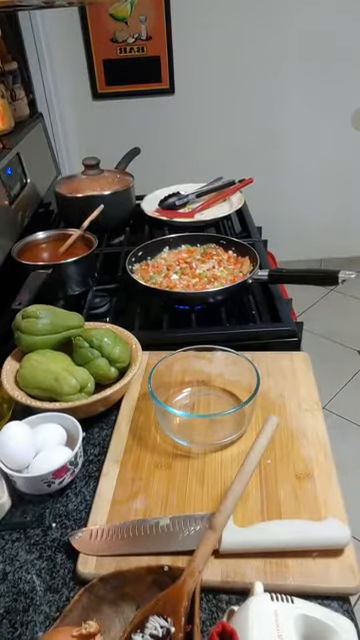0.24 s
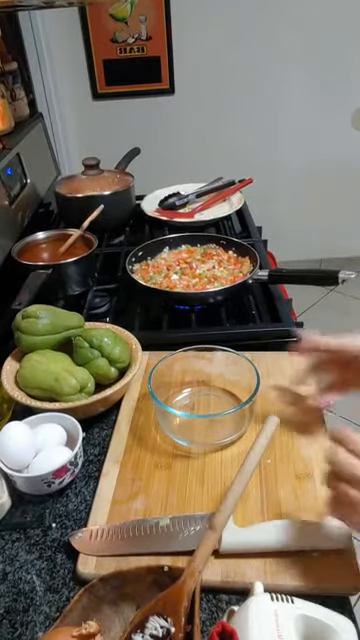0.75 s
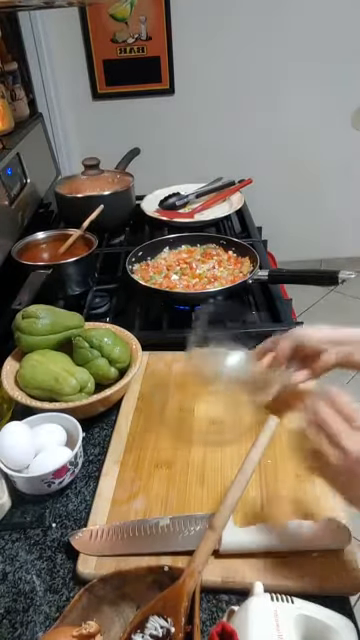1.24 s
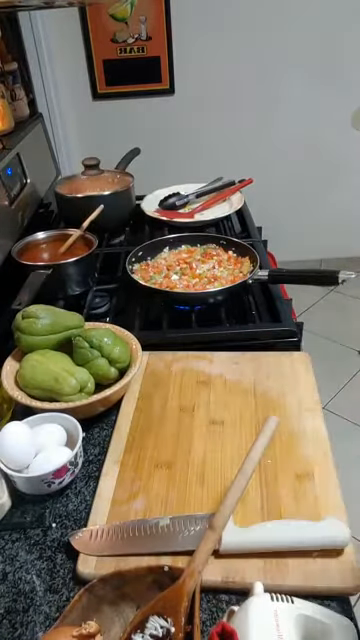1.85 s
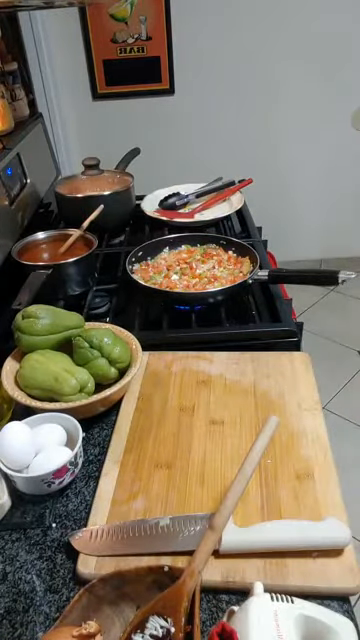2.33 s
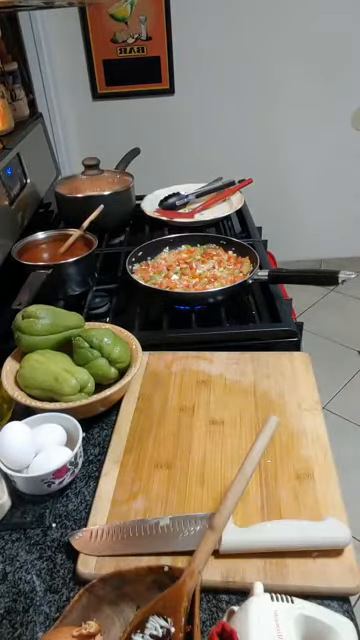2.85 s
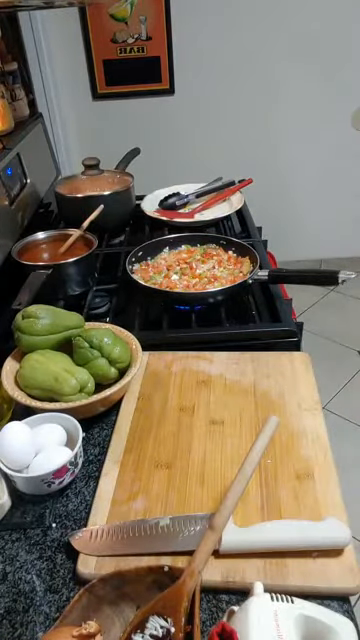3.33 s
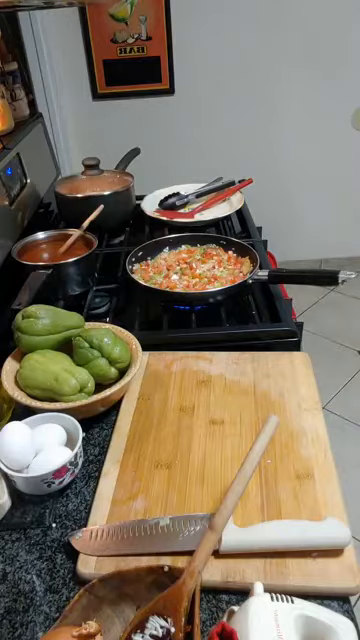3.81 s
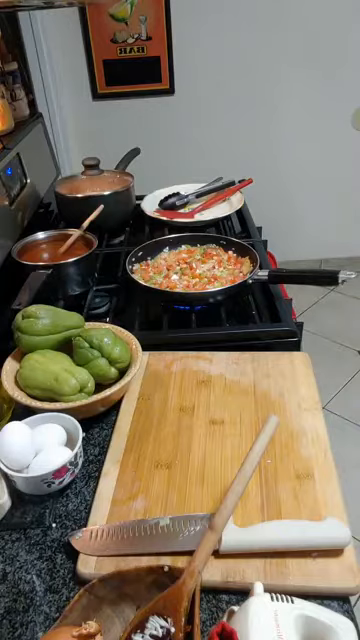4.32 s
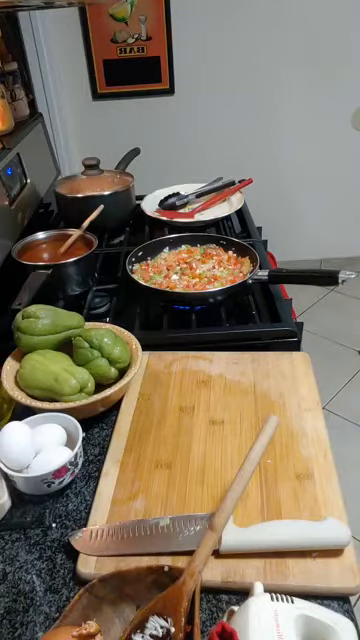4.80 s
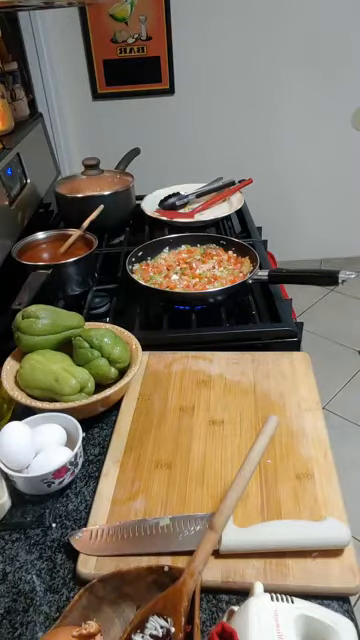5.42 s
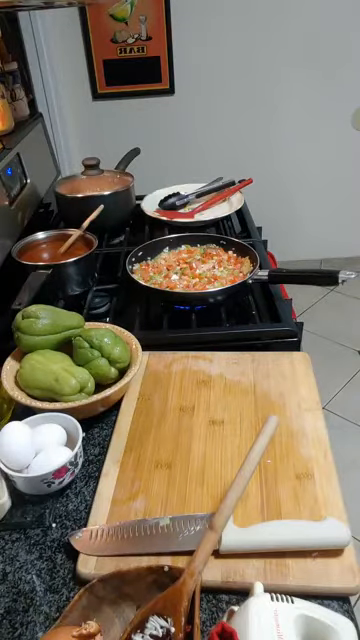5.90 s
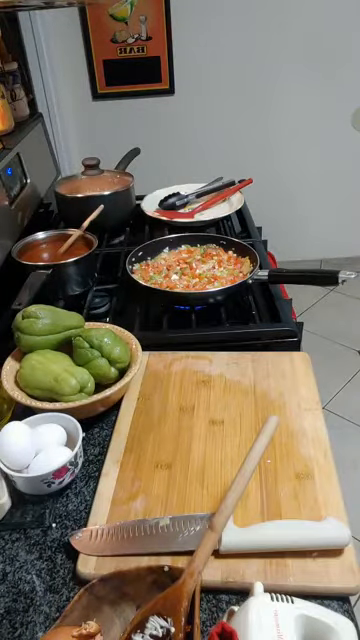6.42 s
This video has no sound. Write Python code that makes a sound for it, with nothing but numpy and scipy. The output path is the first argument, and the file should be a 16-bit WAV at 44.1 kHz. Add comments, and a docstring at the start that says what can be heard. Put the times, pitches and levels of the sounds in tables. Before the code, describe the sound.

In a small kitchen with low hum and soft frying, a glass bowl slides, thuds, clatters thrice at a sink; bright tap water runs, then stops.

```python
"""Kitchen: glass bowl and running tap

In a small hard-walled kitchen a pan sizzles over a gas flame and a refrigerator hums: coloured noise and sines.
A glass bowl is slid off a wooden board (grainy noise), something thumps (noise and a low sine), and the bowl
is rapped three times at the sink (noise cracks, decaying modes). The tap spurts, then hisses for a few seconds
(random bursts, noise through spout resonances, fizzing bubbles, gurgling noise bands), is shut, and drips
(noise ticks) among faint clinks."""
import sys
import numpy as np
from scipy import signal
from scipy.fft import rfft, irfft, next_fast_len
from scipy.io import wavfile
from scipy.ndimage import map_coordinates

SR = 44100
rng = np.random.default_rng(int(sys.argv[2]) if len(sys.argv) > 2 else 0)


def master_out(mix):
    """Clip the mix to full scale and print it as 16-bit PCM to the path in sys.argv[1]."""
    frames = np.transpose(np.atleast_2d(mix))
    ceiling = np.clip(frames, -1, 1)
    pcm = np.round(ceiling * 32767).astype(np.int16)
    wavfile.write(sys.argv[1], SR, pcm)


N = 293397
TIME = np.arange(N) / SR


def amp(db):
    """Decibels to gain."""
    return 10 ** (np.asarray(db) / 20)


def unit(x):
    """x scaled to rms 1."""
    return x / np.sqrt(np.mean(x ** 2) + 1e-20)


def wobble(rate_hz):
    """Smooth random curve through rate_hz normal-distributed knots a second."""
    knots = rng.standard_normal(int(N * rate_hz / SR) + 4)
    return map_coordinates(knots, [TIME * rate_hz])


def ramp(start_s, length_s):
    """0 until start_s, then rising evenly to 1 over length_s."""
    return np.clip((TIME - start_s) / length_s, 0, 1)


def since(start_s):
    """Seconds gone by since start_s, 0 before it."""
    return np.maximum(TIME - start_s, 0)


def decay(age_s, t60_s):
    """Exponential decay by 60 dB in t60_s."""
    return np.exp(-np.log(1000) * age_s / t60_s)


def fade(start_s, attack_s, t60_s):
    """Envelope of a blow: exponential attack with time constant attack_s, then decay."""
    age_s = TIME[:int(2 * t60_s * SR)]
    shape = (1 - np.exp(-age_s / attack_s)) * decay(age_s, t60_s)
    return np.pad(shape, (round(start_s * SR), N))[:N]


def filtered(x, response):
    """x times a response of frequency, zero-padded against wrap-around."""
    size = next_fast_len(N + SR // 2)
    hz = np.fft.rfftfreq(size, 1 / SR)
    return irfft(rfft(x, size) * response(hz), size)[:N]


def coloured(x, spectrum):
    """x filtered by a (Hz, dB) curve, interpolated over log frequency, at rms 1."""
    f, db = np.transpose(spectrum)
    return unit(filtered(x, lambda hz: amp(np.interp(np.log(hz + 1), np.log(f), db))))


def roomy(x, wet_db=0, t60_s=0.34):
    """Direct sound plus a dense tail from the walls, which ripples a steady spectrum."""
    age_s = TIME[:SR // 2]
    tail = rng.standard_normal(len(age_s)) * decay(age_s, t60_s)
    tail /= np.linalg.norm(tail)
    return x + amp(wet_db) * signal.fftconvolve(x, tail)[:N]


def noise(spectrum):
    """Smooth noise with a (Hz, dB) spectrum, heard in the room, rms 1."""
    return coloured(roomy(rng.standard_normal(N), wet_db=-1.0, t60_s=0.4), spectrum)


def patter(rate_hz, spread_db, life_s):
    """Noise bursts at random moments and of random sizes, amplitude falling by e in life_s; rms 1."""
    hits = rng.random(N) < rate_hz / SR
    sizes = amp(spread_db * np.clip(rng.standard_normal(N), -2, 2))
    cloud = signal.lfilter([1], [1, -np.exp(-2 / (life_s * SR))], hits * sizes ** 2)  # energy
    return unit(np.sqrt(cloud) * rng.standard_normal(N))


def tone(hz):
    """Sine of rms 1 and random phase."""
    return np.sqrt(2) * np.sin(2 * np.pi * (hz * TIME + rng.random()))


def resonance(hz, centre_hz, width_hz):
    """Complex response of one resonance, peak gain 1."""
    return 1j * hz * width_hz / (centre_hz ** 2 - hz ** 2 + 1j * hz * width_hz)


def resonant(centre_hz, width_hz):
    """White noise through one resonance."""
    return filtered(rng.standard_normal(N), lambda hz: resonance(hz, centre_hz, width_hz))


def murmur(centre_hz, width_hz):
    """Band of noise, 6 dB down at the edges of width_hz, rms 1."""
    return unit(filtered(rng.standard_normal(N), lambda hz: 1 / (1 + (2 * (hz - centre_hz) / width_hz) ** 2)))


def ringing(hz, envelope):
    """One mode whose reflections interfere with it, so that level and phase waver."""
    interference = amp(2 * wobble(110))
    phase_rad = 0.76 * wobble(80)
    return envelope * interference * np.sqrt(2) * np.sin(2 * np.pi * hz * TIME + phase_rad)


# fat in the pan: (frequency [Hz], density [dB per Hz])
SIZZLE_SPECTRUM = [(300, -7.5), (710, -9.5), (1200, -23.5), (1760, -18), (2000, -16.5), (2170, -15.5),
                   (3540, -12), (5040, -12), (6880, 0.5), (7560, 3.5), (8470, -7), (9210, -14),
                   (10500, -17), (13500, -18.5), (14400, -25)]
PAN_DB, PAN_WANDER_DB = -54, 0.1
# fat spitting: (time [s], level [dB])
SPITS = [(.23, -61), (.43, -56), (0.66, -51), (2.325, -58), (2.437, -50)]


def pan():
    """Countless tiny bursts of frying fat, swelling at each spit."""
    frying = amp(PAN_DB + PAN_WANDER_DB * wobble(4.5))
    spits = sum(amp(db) * fade(s, 0.001, 0.36) for s, db in SPITS)
    bursts = patter(rate_hz=2500, spread_db=-0.5, life_s=0.0034)
    return (frying + spits) * coloured(roomy(bursts, wet_db=-9.5), SIZZLE_SPECTRUM)


# flame roar and room rumble: (frequency [Hz], density [dB per Hz])
FLAME_SPECTRUM = [(25, -25), (42, -13), (58, -3.5), (72, -9.5), (92, -23.5), (125, 2), (155, -8.5),
                  (190, -4), (260, -14.5), (400, -18.5), (520, -21.5), (660, -33), (950, -26.5),
                  (1400, -32.5), (2400, -45.5)]


def flame():
    """Steady low-weighted noise of the gas flame and the room."""
    return amp(-53.5) * coloured(rng.standard_normal(N), FLAME_SPECTRUM)


# refrigerator partials: (frequency [Hz], rms level before a common -2 dB trim [dB])
HUM_PARTIALS = [(59.2, -57.5), (118.4, -60), (183.0, -57.5), (360.7, -73)]


def refrigerator():
    """Sines whose levels wander independently."""
    return sum(amp(db - 2.0 + 1.2 * wobble(6.1)) * tone(hz) for hz, db in HUM_PARTIALS)


# soft handling bumps; the two near 1.51 s belong to the last dull knock:
# (time [s], centre [Hz], level [dB])
SCUFFS = [(.615, 229, -47.5), (.68, 290, -54), (.75, 264, -54), (.765, 1030, -60.5), (.875, 270, -47.5),
          (0.931, 240, -49), (1.211, 505, -50), (1.51, 960, -48.5), (1.515, 174, -38), (2.14, 1200, -56)]


def scuffs():
    """Soft, pitchless bumps: fading noise bands half as wide as their centre frequency."""
    return sum(amp(db) * fade(s, 0.0057, 0.28) * murmur(hz, 0.5 * hz) for s, hz, db in SCUFFS)


# bowl contacts: (time [s], clack before a -2.5 dB trim [dB], grit [dB], sink modes [dB],
#                 low glass modes [dB], high glass modes [dB])
RAPS = [(.854, -54.5, -59, -73, -53, -56), (2.6199, -20.5, -49, -23.5, -37, -18.5),
        (2.7538, -18, -53, -22, -22.5, -13.5), (2.89, -19.5, -29.5, -16, -17.5, -25)]
# hard contact: (frequency [Hz], density [dB per Hz])
CLACK_SPECTRUM = [(60, -27), (140, -8.5), (300, -15.5), (480, -7), (640, -9), (900, 1), (1300, -4.5),
                  (1700, -2), (2400, -12), (3700, -7), (5200, -23.5), (6400, -4.5), (8600, -11.5),
                  (9300, -42)]
# glancing contact: (frequency [Hz], density [dB per Hz])
GRIT_SPECTRUM = [(5000, -28), (7000, -20), (8800, 12), (9400, -28), (10000, -21), (10350, 7), (11500, -7),
                 (12700, -8), (13300, -35)]
# struck sink: (frequency [Hz], relative level [dB], t60 [s])
SINK_MODES = [(724, -20.5, 0.26), (788, -14.5, 0.18), (950, -11.5, 0.35), (1030, -10.5, 0.18),
              (1848, -24, 0.13)]
# bowl: (frequency [Hz], relative level [dB], t60 [s])
GLASS_MODES = [(2120, -16.5, 0.41), (3600, -4, 0.27), (6097, -1.5, 0.33), (8860, -22, 0.27),
               (10330, -28, 0.25), (11060, -23.5, 0.21), (11810, -35, .27)]


def bowl():
    """Each contact cracks and rings glass and sink, its levels deciding which modes speak."""
    clack, grit = np.zeros((2, N))
    for s, clack_db, grit_db, *_ in RAPS:
        crack = 1.1 * fade(s, 0.0003, 0.03)
        blow = crack + fade(s, 0.0041, 0.33)  # the walls prolong the crack
        clack += amp(clack_db) * blow
        grit += amp(grit_db) * blow
    out = amp(-2.5) * clack * noise(CLACK_SPECTRUM) + grit * noise(GRIT_SPECTRUM)
    for hz, db, t60_s in SINK_MODES:
        strikes = sum(amp(sink_db) * fade(s, 0.00093, t60_s) for s, _, _, sink_db, _, _ in RAPS)
        out += amp(db) * ringing(hz, strikes)
    # the bowl is not quite round: each mode is a close pair, heard as a 21 Hz beat
    beats = [1 + 0.4 * np.cos(2 * np.pi * 21 * (TIME - s - 0.017)) for s, *_ in RAPS]
    for hz, db, t60_s in GLASS_MODES:
        envelope = np.zeros(N)
        for (s, *_, low_db, high_db), beat in zip(RAPS, beats):
            strike_db = high_db if hz > 5000 else low_db
            envelope += amp(strike_db) * fade(s, 0.0066, t60_s) * beat
        out += amp(db) * ringing(hz, envelope)
    return out


# bowl's foot on the board: (frequency [Hz], density [dB per Hz])
SCRAPE_SPECTRUM = [(240, -40), (400, -22), (565, -13), (700, -26), (969, -17.5), (2420, -23), (2980, -14.5),
                   (5270, -15), (7120, 2), (10400, -24), (14400, -23)]
SLIDE_S, SLIDE_ATTACK_S, SLIDE_HOLD_S, SLIDE_T60_S, SLIDE_DB = 0.94, 0.047, 0.028, 0.3, -37.5


def slide():
    """One short stroke: the bowl's foot drags over the wood grain and lifts off."""
    lift_s = SLIDE_S + SLIDE_ATTACK_S + SLIDE_HOLD_S
    stroke = ramp(SLIDE_S, SLIDE_ATTACK_S) * decay(since(lift_s), SLIDE_T60_S)
    grain = patter(rate_hz=1000, spread_db=1, life_s=0.0091)
    return amp(SLIDE_DB) * stroke * coloured(grain, SCRAPE_SPECTRUM)


# dull knocks: (time [s], body [dB], boom [dB], rattle [dB])
KNOCKS = [(1.2, -43, -57, -47), (1.289, -46.5, -52, -54), (1.367, -39.5, -62, -38.5),
          (1.383, -25, -24.5, -32.5), (1.49, -43, -38, -59)]
# knocked wood: (frequency [Hz], density [dB per Hz])
BODY_SPECTRUM = [(24, -35), (45, -11), (100, -4), (175, -4.5), (290, -21.5), (450, -19.5), (700, -24),
                 (1150, -24), (1600, -29.5), (3000, -49), (5000, -76)]
# light rattle: (frequency [Hz], density [dB per Hz])
RATTLE_SPECTRUM = [(1180, -42), (2000, -13), (2520, -12), (2670, -9), (3370, -11), (4610, -5.5),
                   (5300, -10.5), (7560, 1), (8990, -11.5), (14400, -27)]


def knocks():
    """Dull thumps on wood: short noise body, 60 Hz boom and light noise rattle."""
    body = sum(amp(db) * fade(s, 0.0017, 0.31) for s, db, _, _ in KNOCKS)
    boom = sum(amp(db) * fade(s, 0.0089, 0.29) for s, _, db, _ in KNOCKS)
    rattle = sum(amp(db) * fade(s, 0.0015, 0.29) for s, _, _, db in KNOCKS)
    return body * noise(BODY_SPECTRUM) + boom * tone(60) + rattle * noise(RATTLE_SPECTRUM)


# the opening tap's first two spurts, then drops on the sink floor after it shuts:
# (time [s], tick [dB], splash [dB])
SPURTS_AND_DRIPS = [(3.097, -49, -45), (3.156, -36.5, -54), (5.667, -29, -44), (5.722, -33, -51),
                    (5.804, -39.5, -54), (5.913, -50, -45.5), (6.071, -41, -52), (6.152, -48, -60),
                    (6.203, -37.5, -68), (6.287, -35.5, -46), (6.535, -44.5, -47.5)]
# bright tick: (frequency [Hz], density [dB per Hz])
TICK_SPECTRUM = [(2350, -53), (4000, -38), (5310, -28), (5640, -15), (7230, 9.5), (7710, 6.5), (8680, -14),
                 (11000, -37.5), (14300, -64), (22000, -120)]
# splash, also the jet's spray: (frequency [Hz], density [dB per Hz])
SPRAY_SPECTRUM = [(150, -32), (600, -29.5), (1200, -28.5), (2100, -22), (2450, -23), (2750, -14.5),
                  (3150, -18), (3700, -15.5), (4700, -13.5), (5100, -14.5), (7400, 0.5), (8800, -13.5),
                  (10300, -15), (13000, -17.5), (14200, -14.5)]


def spurts_and_drips():
    """Each spurt or drop gives a bright tick and a broader splash that the walls prolong."""
    tick = sum(amp(db) * fade(s, 0.00079, 0.21) for s, db, _ in SPURTS_AND_DRIPS)
    splash = sum(amp(db) * fade(s, 0.0035, 0.42) for s, _, db in SPURTS_AND_DRIPS)
    return tick * noise(TICK_SPECTRUM) + splash * noise(SPRAY_SPECTRUM)


OPEN_S, OPENING_S, SHUT_S = 3.145, 0.078, 5.6
HISS_DB, HISS_POWER, HISS_FALL_DB_PER_S = -22.5, 5.5, 185  # power: of the valve opening
SPRAY_DB, WETTING_S, SPRAY_FALL_DB_PER_S = -28.5, 0.079, 99  # wetting: time constant
SURGE_RATE_HZ, SURGE_DB = 6.2, 0.72  # wander of the water pressure


def flow():
    """Gains of hiss and spray: hiss needs full flow; spray swells as the sink wets, dies as the spout empties."""
    surge_db = SURGE_DB * wobble(SURGE_RATE_HZ)
    opening = ramp(OPEN_S, OPENING_S) ** HISS_POWER
    wet = 1 - np.exp(-since(OPEN_S) / WETTING_S)
    hiss = opening * amp(HISS_DB + surge_db - HISS_FALL_DB_PER_S * since(SHUT_S))
    spray = wet * amp(SPRAY_DB + surge_db - SPRAY_FALL_DB_PER_S * since(SHUT_S))
    return hiss, spray


# water slopping in the basin: (centre [Hz], level relative to spray [dB])
SLOP_BANDS = [(850, -39), (1800, -29.5), (4100, -19.5)]
# spout resonances: (centre [Hz], width [Hz], relative level before the 7400 Hz weighting [dB])
SPOUT_RESONANCES = [(5910, 40, -16.5), (6330, 34, -23), (6870, 55, -23), (6755, 35, -7), (7280, 85, -5),
                    (7450, 52, -4), (7700, 59, -17), (7860, 240, -9.5), (8224, 36, -6), (8680, 130, -18),
                    (9630, 166, -12)]


def tap():
    """The aerated jet breaks into countless drops; its hiss rings the spout."""
    hiss_gain, spray_gain = flow()
    drops = roomy(patter(rate_hz=6000, spread_db=1.0, life_s=0.00038), wet_db=-4, t60_s=0.19)
    # slow, uneven patches
    slop = sum(amp(db + 2.65 * wobble(22)) * murmur(hz, 0.5 * hz) for hz, db in SLOP_BANDS)
    spray = coloured(drops, SPRAY_SPECTRUM) + slop
    spout = sum(amp(db) * resonant(centre, width) for centre, width, db in SPOUT_RESONANCES)
    spout = unit(filtered(spout, lambda hz: 1 / (1 + ((hz - 7400) / 1800) ** 4)))
    flutter = amp(1.13 * wobble(45) + 0.36 * wobble(370))  # air in the jet unsettles the whistle
    return spray_gain * spray + hiss_gain * flutter * spout


FIZZ_RATE_HZ, FIZZ_HZ, FIZZ_HALF_RANGE_OCTAVES = 70, 1697, 2 * 0.907
FIZZ_MIN_DB, FIZZ_SPREAD_DB, FIZZ_T60_S = -51, 2, 0.029  # before the room


def fizz():
    """The jet traps small bubbles at random; each rings briefly at its own pitch."""
    out, age_s = np.zeros(N + SR), TIME[:SR // 10]
    flow_s = SHUT_S - OPEN_S
    for when, pitch, size in rng.random((int(FIZZ_RATE_HZ * flow_s), 3)):
        start = round((OPEN_S + OPENING_S + when * flow_s) * SR)
        hz = FIZZ_HZ * 2 ** (FIZZ_HALF_RANGE_OCTAVES * (2 * pitch - 1))
        level_db = FIZZ_MIN_DB - FIZZ_SPREAD_DB * np.log(1 - size)  # exponential spread
        ring = np.sin(2 * np.pi * hz * age_s) * decay(age_s, FIZZ_T60_S)
        out[start:start + len(age_s)] += amp(level_db) * ring
    return roomy(out[:N], wet_db=-1, t60_s=0.29)


# gurgles while the tap runs and as it shuts, then three faint clinks from 5.885 s:
# (time [s], pitch [Hz], level [dB])
GURGLES_AND_CLINKS = [(3.33, 890, -51), (3.335, 2540, -37.5), (3.339, 300, -44), (3.43, 640, -46.5),
                      (5.073, 1070, -42.5), (5.12, 800, -49), (5.26, 1210, -44), (5.48, 1260, -44),
                      (5.68, 559.6, -51), (5.885, 2150, -53), (6.517, 2660, -53), (6.537, 1950, -56)]


def gurgles_and_clinks():
    """Gurgles, then three faint clinks afterwards, each a fading noise band around one pitch."""
    return sum(amp(db) * fade(s, 0.0056, 0.16) * murmur(hz, 250) for s, hz, db in GURGLES_AND_CLINKS)


def scene():
    """All sources at one microphone."""
    room = pan() + flame() + refrigerator() + scuffs()
    contacts = bowl() + slide() + knocks()
    water_and_clinks = spurts_and_drips() + tap() + fizz() + gurgles_and_clinks()
    return (room + contacts + water_and_clinks)[None]


BASS_HZ, HOLLOW_HZ, HOLLOW_WIDTH_HZ, TOP_HZ = 33, 2440, 170, 14300


def microphone(hz):
    """Response with a bass cut and a narrow hollow in the upper midrange."""
    hollow = 1 - 0.85 * resonance(hz, HOLLOW_HZ, HOLLOW_WIDTH_HZ)
    return hollow * hz ** 4 / (hz ** 4 + BASS_HZ ** 4)


def record(dry):
    """The microphone colours the sound; nothing is kept from TOP_HZ up."""
    return np.array([filtered(x, lambda hz: microphone(hz) * (hz < TOP_HZ)) for x in dry])


dry = scene()
out = record(dry)
master_out(out)
```